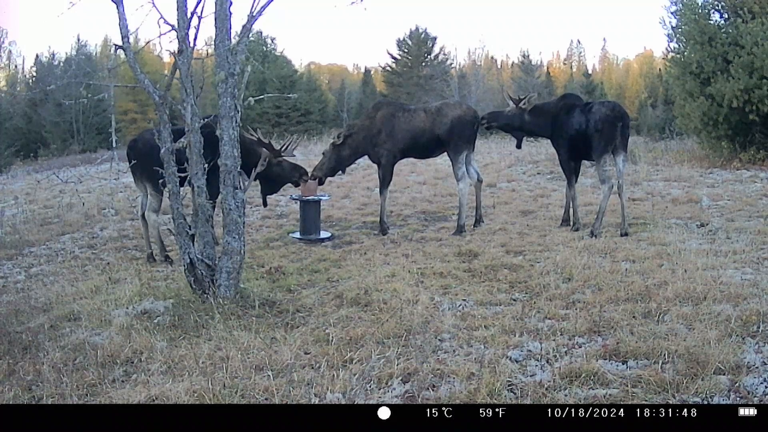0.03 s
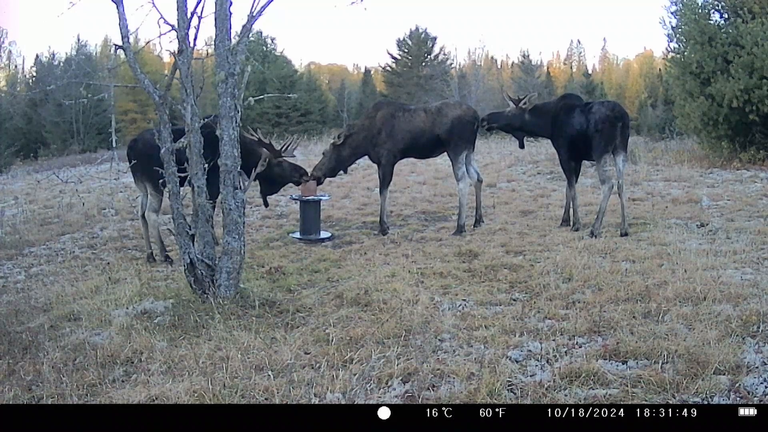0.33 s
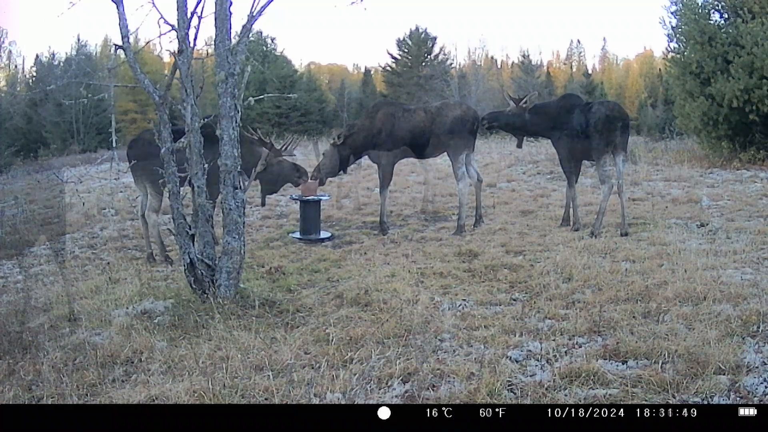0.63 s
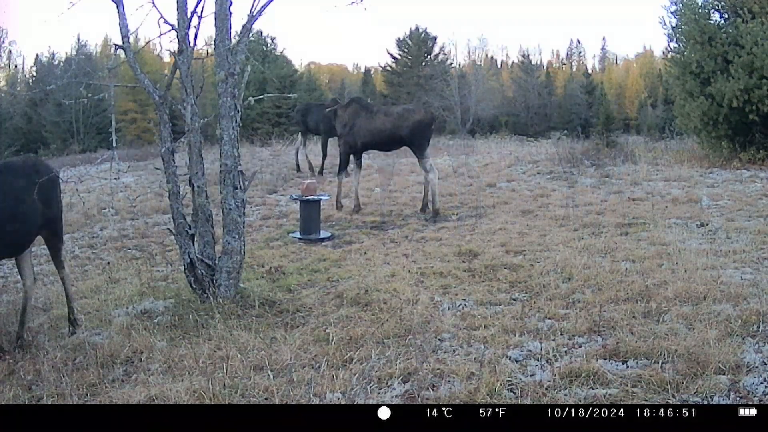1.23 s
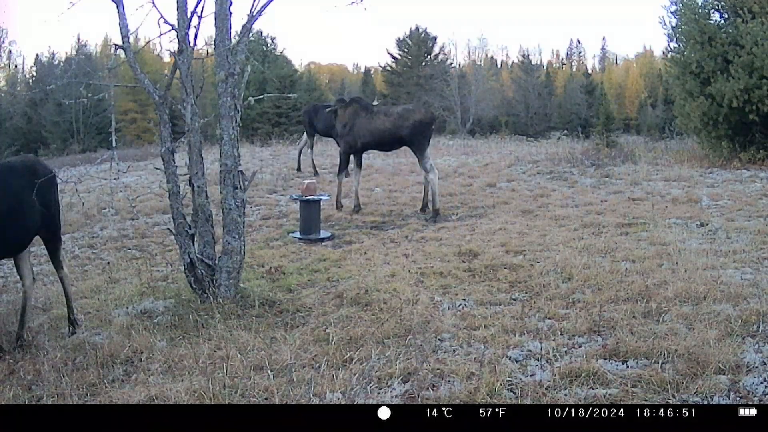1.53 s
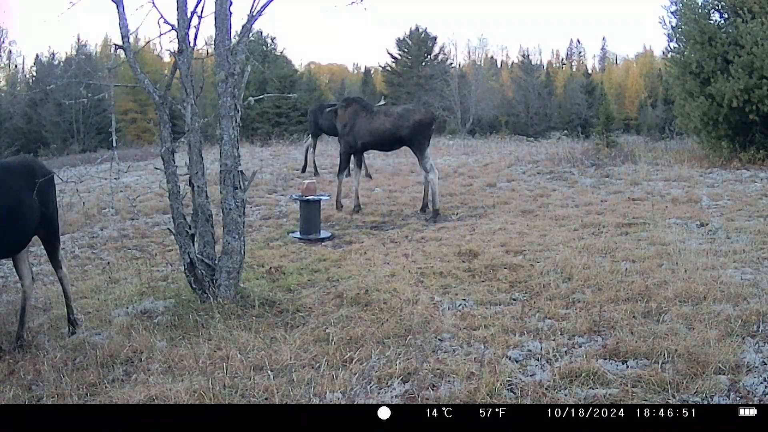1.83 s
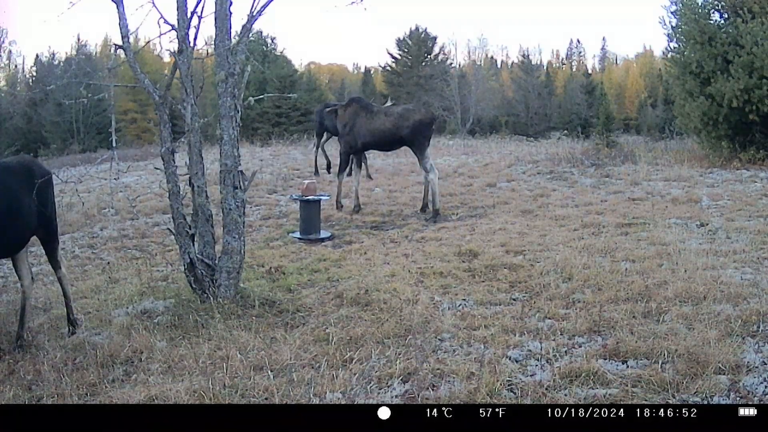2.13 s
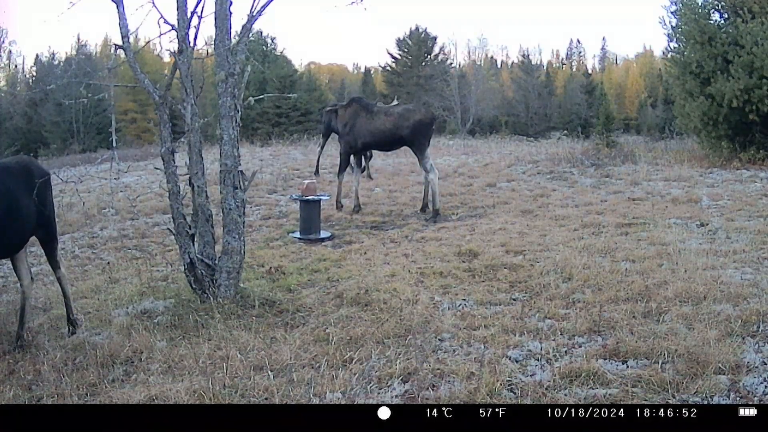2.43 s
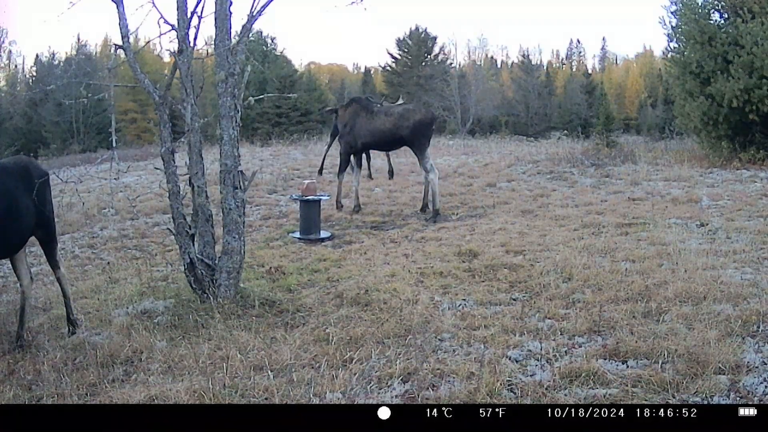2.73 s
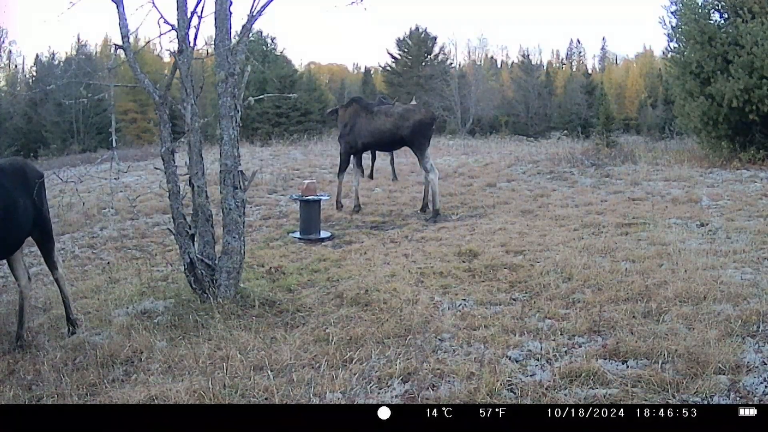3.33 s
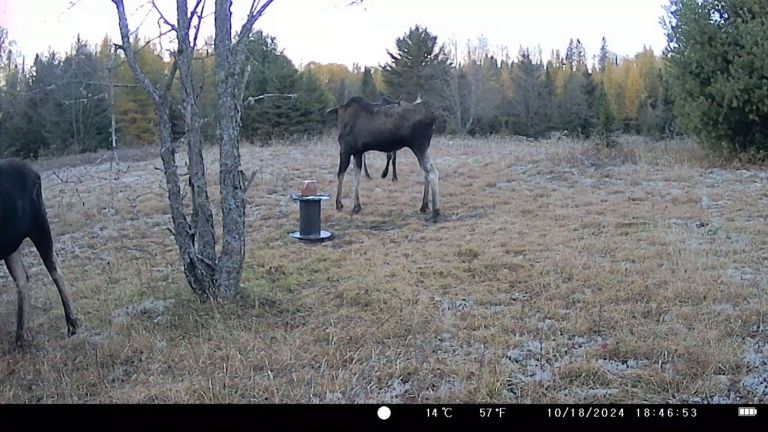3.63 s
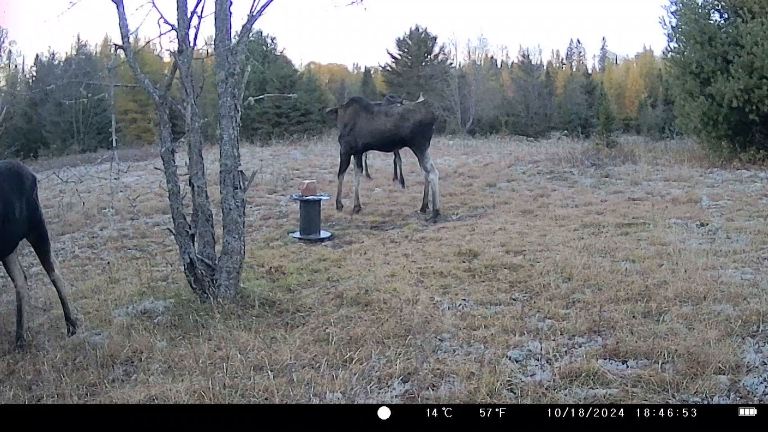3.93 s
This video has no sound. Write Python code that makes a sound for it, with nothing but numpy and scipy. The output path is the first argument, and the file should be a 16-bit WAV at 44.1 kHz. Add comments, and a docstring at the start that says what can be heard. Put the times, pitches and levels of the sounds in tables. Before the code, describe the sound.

A moose gives one long nasal moan from about 1.4 to 3.1 seconds, sliding down onto a held note, then falling away with a faint echo from the trees. Before it, sharp clicks sound at 0.4 and 1.4 seconds. From 0.4 seconds until about 4, hooves softly brush and crunch through frozen grass and small stalks snap, over low air rumble and hiss.

```python
"""A frosty clearing, heard through one narrow-band microphone over low air rumble and hiss.
A sharp click marks an edit point where the DC offset steps down; hooves start brushing through frozen
grass and stalks snap. A second later the offset clicks back at another edit point and a moose gives one
long nasal moan: it slides down onto a held note, opens its mouth and lets the pitch fall, while the
forest edge answers faintly from farther off. The hooves carry on after the call."""
import sys
import numpy as np
from scipy import signal
from scipy.fft import rfft, irfft, next_fast_len
from scipy.io import wavfile
from scipy.ndimage import map_coordinates

SR = 44100
rng = np.random.default_rng(int(sys.argv[2]) if len(sys.argv) > 2 else 0)


def transcribe(u):
    """Save the signal u as a 16-bit wav file named by the first command-line argument.

    u: samples, shape (n,) or (channels, n), limited to [-1, 1]; the rate is SR.
    q: integer samples, one column per channel.
    """
    v = np.clip(np.atleast_2d(u).T, -1, 1)
    q = np.round(v * 32767).astype(np.int16)
    wavfile.write(sys.argv[1], SR, q)


N = 176400
OFFSET_DROP_S, OFFSET_RETURN_S = 0.39261, 1.36961  # two edit points, each a sharp click


def moan():
    """Overtones of the vocal folds pass through the throat; the opening mouth lifts the upper resonance."""
    # pitch of the vocal folds: t/s, f/Hz
    melody = [(1.35, 301.7), (1.41, 286), (1.5, 264.4), (1.64, 249.2), (1.76, 242.6), (1.87, 246.2),
              (2.01, 241.9), (2.11, 247.1), (2.34, 245), (2.42, 246.7), (2.55, 245.3), (2.67, 247.6),
              (2.86, 240.7), (2.92, 228.8), (3.02, 198.6), (3.08, 171.6)]
    # strength of the voice ahead of the throat: t/s, level/dB
    effort = [(1.3, -90), (1.38, -65.5), (1.5, -61), (1.595, -58), (1.625, -52.5), (1.69, -54.5),
              (1.8, -52), (1.97, -52), (2.33, -51), (2.72, -49.5), (2.88, -51.5), (2.95, -52), (3.0, -56),
              (3.05, -57), (3.075, -61.5), (3.11, -100)]
    # the mouth: t/s, opening/0-1
    mouth = [(1.6, 0.6), (1.66, 0.03), (1.78, 0.1), (1.99, 0.49), (2.2, 0.69), (2.7, 0.64), (2.85, 0.88),
             (3.05, 1)]
    # response of throat and muzzle, mouth wide open: f/Hz, level/dB
    open_throat = [(170, -35), (225, -20), (245, -13.5), (400, -21.5), (490, -12), (570, -4), (655, 4),
                   (735, 0), (830, -1.5), (930, -0.5), (980, 0.5), (1060, -9.5), (1130, -18), (1230, -25),
                   (1500, -46), (3000, -58)]
    # change with the mouth closed: f/Hz, level/dB
    closed_mouth = [(245, 7.5), (520, 1.5), (735, 1.5), (980, -10), (2000, -16.5)]
    # change in the soft, hummed start, which lacks the upper overtones: f/Hz, level/dB
    hummed = [(245, -1), (520, 3), (780, -4), (1000, -19.5), (2000, -26)]
    # change as the throat tightens at the end, favouring the upper resonance: f/Hz, level/dB
    tight_throat = [(200, -11), (420, -5), (600, -0.5), (760, -5.5), (930, 5.5), (1200, -0.5)]
    # turbulence relative to each overtone; the voice catches as it opens and ends: t/s, level/dB
    turbulence = [(1.58, -30.5), (1.62, -8.5), (1.68, -31.5), (2.85, -29), (2.97, -18), (3.06, -8)]
    full_voice_s, tighten_s = 1.615, 2.99
    nasal_hz, nasal_width_hz, nasal_peak_s = 2010, 97, 2.6  # a thin resonance swelling in the held note
    jitter, shimmer_db, flutter_db = 0.0018, 0.4, 0.29  # waver of pitch, loudness and single overtones
    t = np.arange(N) / SR
    pitch = curve(melody) * (1 + jitter * wobble(35))
    phase = 2 * np.pi * np.cumsum(pitch) / SR
    shut = 1 - np.clip(curve(mouth), 0, 1)
    humming = (1 - np.tanh((t - full_voice_s) / 0.0039)) / 2
    tightness = (1 + np.tanh((t - tighten_s) / 0.034)) / 2
    nasal_swell = amp(-26.5) / (1 + ((t - nasal_peak_s) / 0.3) ** 2)
    roughness = amp(curve(turbulence))
    voice = np.zeros(N)
    for k in range(1, 9):
        hz = k * pitch
        throat_db = along(open_throat, hz) + shut * along(closed_mouth, hz)
        throat_db += humming * along(hummed, hz) + tightness * along(tight_throat, hz)
        nasal = nasal_swell * np.exp(-((hz - nasal_hz) / nasal_width_hz) ** 2)
        flutter = amp(k * flutter_db * wobble(18))
        rasp = wobble(160) * np.sin(k * phase) + wobble(160) * np.cos(k * phase)
        voice += (amp(throat_db) + nasal) * flutter * (np.sin(k * phase) + roughness * rasp)
    return np.sqrt(2) * voice * amp(curve(effort) + shimmer_db * wobble(25))


def hooves():
    """Legs brush the frozen grass and hooves crush the frost; the grass stirs faintly between steps."""
    # strokes through the grass: peak t/s, level/dB, rise/s, fall/s
    steps = [(.47, -70, 0.027, 0.056), (.6, -70, 0.045, 0.041), (.657, -62, .02, 0.013),
             (1.035, -66, .03, 0.045), (1.25, -77, 0.031, 0.037), (1.46, -68, 0.028, 0.086),
             (1.57, -70.5, 0.017, .03), (1.82, -69.5, .03, 0.033), (1.93, -67.5, 0.024, 0.036),
             (2.21, -65, 0.061, .05), (2.56, -64, 0.064, .1), (2.98, -64.5, 0.036, 0.051),
             (3.1, -67.5, .04, 0.046), (3.42, -73, 0.07, 0.12), (3.76, -71, 0.037, 0.033),
             (3.97, -71, .02, 0.026)]
    # hooves pressing into the frost: peak t/s, level/dB, rise/s, fall/s
    crunches = [(1.645, -57.5, 0.03, 0.041), (2.785, -58, 0.038, 0.024), (2.83, -55, 0.014, 0.023),
                (3.24, -57, 0.044, 0.031), (3.685, -58.5, 0.027, 0.026)]
    # spectrum of brushed grass: f/Hz, relative level/dB
    grass = [(1000, -41.5), (3000, -19.5), (5000, -14), (5700, -5.5), (6300, -1), (7100, -5), (7700, -10.5),
             (8300, -18)]
    # spectrum of crushed frost: f/Hz, relative level/dB
    frost = [(1000, -26.5), (2400, -17.5), (3100, -11.5), (4700, -10.5), (6000, -1.5), (6900, 0.5),
             (7600, -8), (8300, -15)]
    stir = amp(-74 + 1.1 * wobble(9)) * (np.arange(N) / SR > OFFSET_DROP_S)
    brushing = np.sqrt(strokes(steps) + stir ** 2) * crackle(grass)
    crushing = np.sqrt(strokes(crunches)) * crackle(frost)
    return brushing + crushing


def strokes(rows):
    """Summed power of leg movements that swell and fade."""
    t = np.arange(N) / SR
    power = np.zeros(N)
    for peak_s, db, rise_s, fall_s in rows:
        width_s = np.where(t < peak_s, rise_s, fall_s)
        power += amp(db) ** 2 * np.exp(-np.abs((t - peak_s) / width_s) ** 1.8)
    return power


def crackle(spectrum):
    """Dense tiny fractures of uneven size, each ringing briefly at its own pitch."""
    grains_per_s, decay_s, low_hz, high_hz = 4000, 0.00066, 1500, 8870
    when, pitch, size = rng.random((int(grains_per_s * N / SR), 3)).T
    t = np.arange(SR // 200) / SR
    hz = low_hz + (high_hz - low_hz) * pitch
    strength = amp(-1.5 * np.log(1 - size))  # many small, a few large
    grains = strength[:, None] * np.sin(2 * np.pi * hz[:, None] * t) * np.exp(-t / decay_s)
    places = (when * N).astype(int)[:, None] + np.arange(len(t))
    fractures = np.bincount(places.ravel(), grains.ravel(), N)[:N]
    return coloured(fractures, spectrum)


def stalks():
    """Each stalk snaps with a few milliseconds of bright, narrow noise."""
    # single stalks breaking: t/s, peak level/dB, ring f/Hz
    snaps = [(.452, -51, 6260), (.546, -57, 6500), (.937, -49, 6200), (2.226, -47, 6220),
             (2.403, -44.5, 6260), (2.786, -45.5, 6360), (2.824, -62, 6700), (3.235, -47, 6540),
             (3.654, -52, 5570), (3.6737, -49.5, 6760), (3.685, -44.5, 4900)]
    rise_s, decay_s, width_hz = 0.00054, 0.0029, 1400
    out = np.zeros(N)
    for start_s, db, ring_hz in snaps:
        age = np.maximum(np.arange(N) / SR - start_s, 0)
        burst = rng.standard_normal(N) * (1 - np.exp(-age / rise_s)) * np.exp(-age / decay_s)

        def resonance(hz):
            damping = 1j * hz * width_hz
            return (damping / (ring_hz ** 2 - hz ** 2 + damping)) ** 2

        snap = filtered(burst, resonance)
        out += amp(db) * snap / np.abs(snap).max()
    return out


def forest_edge(call):
    """Trees across the clearing scatter the call back as a late, faint tail."""
    echo_db, t60_s, build_s = -15, 1.0, 0.031
    t = np.arange(SR) / SR
    tail = rng.standard_normal(SR) * amp(-60 * t / t60_s) * (1 - np.exp(-t / build_s))
    return amp(echo_db) * signal.fftconvolve(call, tail / np.linalg.norm(tail))[:N]


def air():
    """Low rumble running up into microphone hiss, a little louder between the two clicks."""
    # spectrum of rumble and hiss: f/Hz, relative level/dB
    noise_floor = [(5, -1), (20, 2), (40, -6.5), (70, -10.5), (150, -19.5), (300, -24.5), (560, -30),
                   (700, -28), (850, -31.5), (1500, -36.5), (3000, -39.5), (6800, -42), (7600, -41),
                   (8300, -62.5)]
    floor_db, lift_db = -53, 2.5
    return coloured(rng.standard_normal(N), noise_floor) * amp(floor_db + lift_db * offset_dropped())


def offset_dropped():
    """1 between the two edit points, where the DC offset sits lower, else 0."""
    t = np.arange(N) / SR
    return 1. * ((t > OFFSET_DROP_S) & (t < OFFSET_RETURN_S))


def amp(db):
    """Decibels to gain."""
    return 10 ** (np.asarray(db) / 20)


def along(points, hz):
    """Read (f/Hz, value) points at hz, on a log frequency axis."""
    f, values = np.transpose(points)
    return np.interp(np.log(hz + 1), np.log(f + 1), values)


def curve(rows):
    """Join (t/s, value) points, one value per sample."""
    return np.interp(np.arange(N) / SR, *np.transpose(rows))


def wobble(rate):
    """A smooth random curve, rate knots a second."""
    knots = rng.standard_normal(int(N * rate / SR) + 4)
    return map_coordinates(knots, [np.arange(N) * rate / SR])


def filtered(x, response):
    """Pass x through a frequency response."""
    size = next_fast_len(N + SR // 2)
    return irfft(rfft(x, size) * response(np.fft.rfftfreq(size, 1 / SR)), size)[:N]


def coloured(x, spectrum):
    """x shaped by a spectrum, at rms 1."""
    shaped = filtered(x, lambda hz: amp(along(spectrum, hz)))
    return shaped / np.sqrt(np.mean(shaped ** 2) + 1e-20)


def scene():
    """The clearing in mono at the microphone: the call with its echo, the footsteps and the air."""
    call = moan()
    return (call + forest_edge(call) + hooves() + stalks() + air())[None]


def record(dry):
    """A narrow-band microphone, then two sharp clicks as the DC offset steps down and back at edits."""
    # the microphone's treble roll-off: f/Hz, level/dB
    roll_off = [(7000, 0), (7700, -2.5), (8100, -4), (8500, -13)]
    mic_top_hz, click_top_hz = 8550, 16500
    offset, offset_step = -0.038, -0.035
    heard = filtered(dry[0], lambda hz: amp(along(roll_off, hz)) * (hz < mic_top_hz))
    clicked = heard + offset_step * offset_dropped()
    return (filtered(clicked, lambda hz: hz < click_top_hz) + offset)[None]


dry = scene()
out = record(dry)
transcribe(out)
```